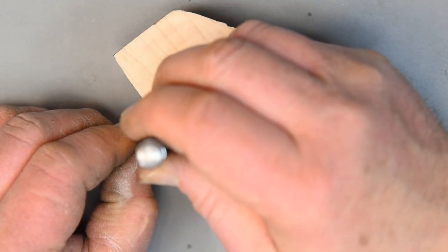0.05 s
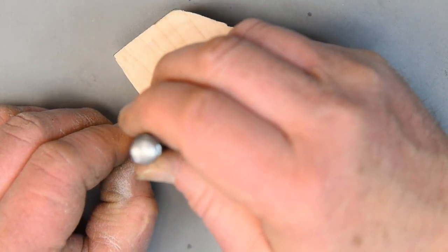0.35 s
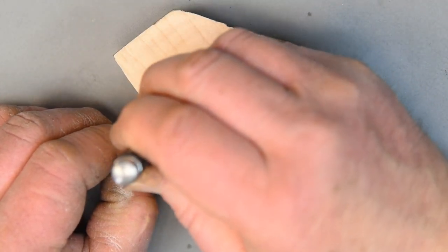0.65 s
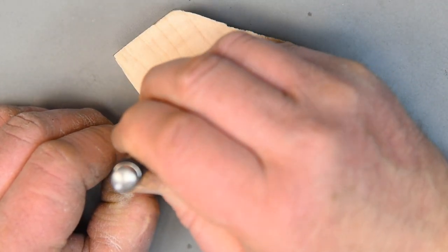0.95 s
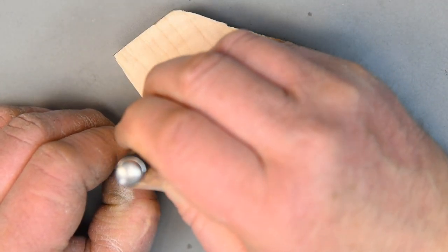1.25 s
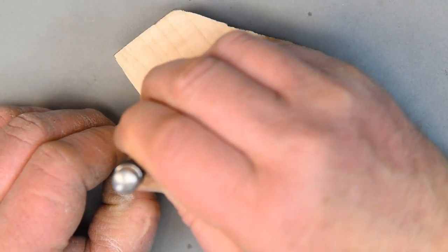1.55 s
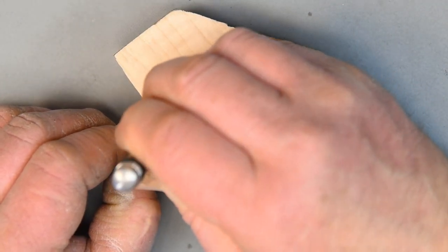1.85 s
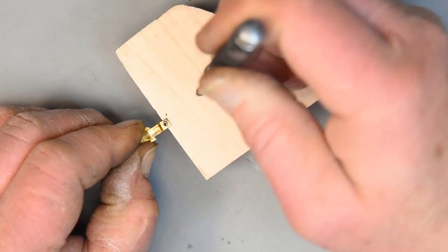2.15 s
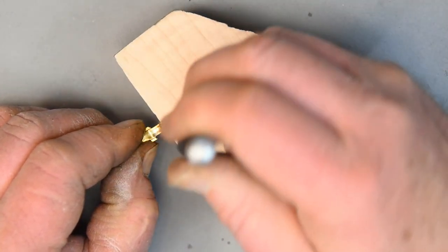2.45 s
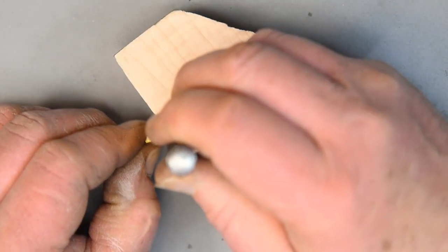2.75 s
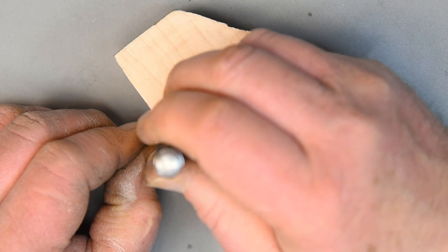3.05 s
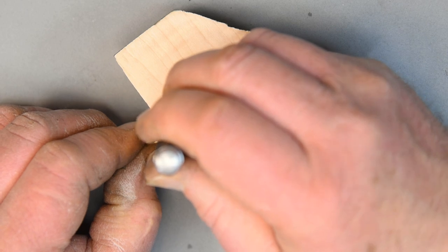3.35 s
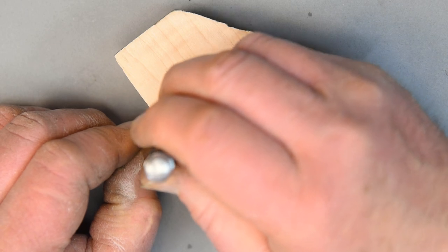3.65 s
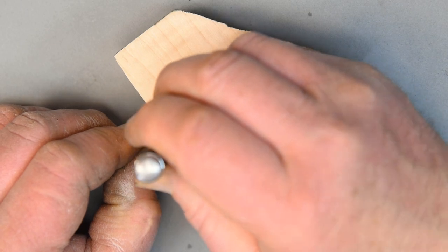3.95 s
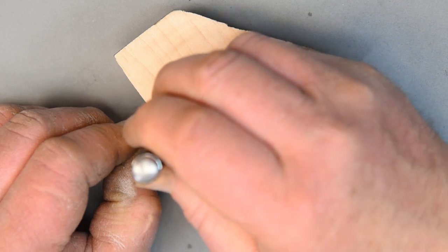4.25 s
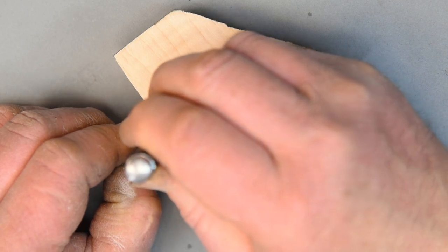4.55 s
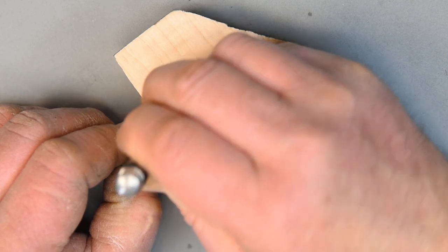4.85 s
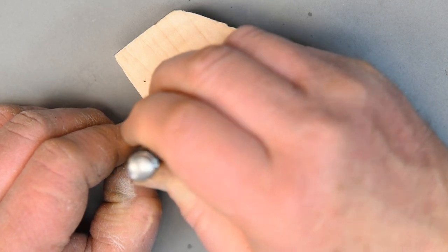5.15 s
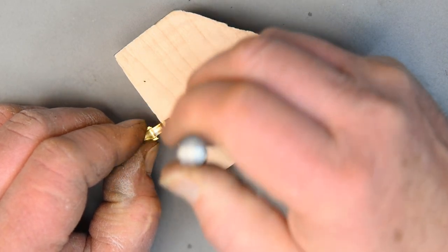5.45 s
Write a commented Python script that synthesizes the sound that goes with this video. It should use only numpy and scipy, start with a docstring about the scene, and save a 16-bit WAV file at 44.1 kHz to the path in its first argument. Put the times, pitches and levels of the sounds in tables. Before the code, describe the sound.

A spring-loaded centre punch snaps sharply twice on a small brass piece on wood, with light knocks and faint grinding between.

```python
"""A spring-loaded centre punch fires twice on a small brass contact on a wooden block.
Each time the catch lets go and the hammer snaps, ringing block and steel rod, overloading the microphone
and swaying the bench. The plunger grinds as the spring is pressed, slides back with a squeak and clacks
home. Light knocks and a bump of the hand fall between, in a small room with mains hum and hiss."""
import sys
import numpy as np
from scipy import signal
from scipy.fft import rfft, irfft
from scipy.io import wavfile

SR = 44100
rng = np.random.default_rng(int(sys.argv[2]) if len(sys.argv) > 2 else 0)


def store_pcm(level_fs):
    """Save levels as 16-bit WAV."""
    pcm = np.round(np.clip(level_fs, -1, 1) * 32767).astype(np.int16)
    wavfile.write(sys.argv[1], SR, np.atleast_2d(pcm).T)


N = 243431
TIME_S = np.arange(N) / SR
RING_S = TIME_S[:SR // 2]


def gain_of(db):
    """Decibels to amplitude."""
    return 10 ** (np.asarray(db) / 20)


def unit_rms(x):
    """Scales to rms 1."""
    return x / np.sqrt(np.mean(x ** 2) + 1e-20)


def curve_at(points, hz):
    """Interpolates on a log-frequency axis."""
    point_hz, value = np.transpose(points)
    return np.interp(np.log(hz + 1), np.log(point_hz + 1), value)


def add(mix, start_s, sound):
    """Mixes a sound in at start_s."""
    part = mix[..., round(start_s * SR):][..., :sound.shape[-1]]
    part += sound[..., :part.shape[-1]]


def panned(x, left_db):
    """Stereo, left over right by left_db."""
    return x * gain_of([[left_db / 2], [-left_db / 2]])


def lowpass(x, hz, order=3):
    """Butterworth low-pass."""
    return signal.sosfilt(signal.butter(order, min(hz, SR / 3), fs=SR, output="sos"), x)


def band(x, hz, width_hz):
    """One resonance, unity peak gain."""
    return signal.lfilter(*signal.iirpeak(hz, hz / width_hz, fs=SR), x)


def colour(x, spectrum):
    """Minimum-phase filter with the given spectrum."""
    log_gain = np.log(gain_of(curve_at(spectrum, abs(np.fft.fftfreq(2048, 1 / SR)))))
    taps = np.fft.ifft(np.exp(np.conj(signal.hilbert(log_gain)))).real
    return signal.fftconvolve(x, taps[:len(taps) // 2])[:len(x)]


def ring(modes, t60_scale=1):
    """Damped sines after a blow; a firm grip shortens them."""
    return sum(gain_of(db - 60 * RING_S / (t60_s * t60_scale)) * np.sin(2 * np.pi * hz * RING_S)
               for hz, db, t60_s in modes)


def emphasis(x, hz, boost_db, width_ratio=0.21):
    """Grip and strike point bring out one region of the ring."""
    width_hz = width_ratio * hz
    return x + (gain_of(boost_db) - 1) * band(band(x, hz, width_hz), hz, width_hz)


def hand_shadow(x, left_db=5, cutoff_hz=2300):
    """The hand shades the right channel: weaker, duller, slightly later."""
    return panned(np.array([x, lowpass(x, cutoff_hz, order=2)]), left_db)


# Noise spectrum: freq_hz, relative_db
HISS_SPECTRUM = [(20, -1.5), (60, -12.5), (150, -9.5), (300, -15.5), (700, -19), (1500, -22.5), (3100, -27),
                 (4000, -24), (4700, -17), (5500, -23), (7000, -27), (10000, -28), (15500, -28)]
# Left-right likeness: freq_hz, correlation
HISS_CORRELATION = [(60, 0.33), (180, 0.85), (550, 0.78), (1650, 0.58), (4970, 0.91), (15000, 0.08)]

def hiss(level_db=-65.5):
    """Steady hiss and rumble, partly shared by the channels."""
    hz = np.fft.rfftfreq(N, 1 / SR)
    left, independent = rfft(rng.standard_normal((2, N)))
    correlation = np.clip(curve_at(HISS_CORRELATION, hz), -1, 1)
    right = correlation * left + np.sqrt(1 - correlation ** 2) * independent
    noise = irfft(np.array([left, right]) * gain_of(curve_at(HISS_SPECTRUM, hz)), N)
    return panned(noise * gain_of(level_db) / noise.mean(0).std(), left_db=0.5)


# Drift of the fundamental: time_s, level_db
MAINS_DRIFT = [(0, -63.5), (1.5, -65), (2.5, -74), (4.4, -85), (4.85, -65.5), (5.52, -68)]
# Steady overtones: pitch_hz, level_db
MAINS_OVERTONES = [(180, -74), (300, -75), (420, -78), (540, -81), (660, -86)]

def mains_hum(pitch_hz=60, trim_db=-1):
    """Mains hum; the fundamental drifts in level."""
    drift_db = np.interp(TIME_S, *np.transpose(MAINS_DRIFT))
    hum = gain_of(drift_db + trim_db) * np.sin(2 * np.pi * pitch_hz * TIME_S)
    hum += sum(gain_of(db) * np.sin(2 * np.pi * (hz * TIME_S + rng.random()))
               for hz, db in MAINS_OVERTONES)
    return panned(np.sqrt(2) * hum, left_db=1.5)


# Room decay: freq_hz, t60_s
ROOM_DECAY = [(100, 0.43), (400, 0.22), (1200, 0.15), (3000, 0.16), (7000, 0.16), (15000, 0.11)]
# Wall reflections: freq_hz, relative_db
WALL_SPECTRUM = [(100, -2.5), (400, -3.5), (1200, 3.5), (3000, 6.5), (7000, 3.5), (15000, 1.5)]

def room(x, gap_s=0.0042):
    """Dense small-room reflections, each band dying at its own rate."""
    hz, time_s, noise = signal.stft(rng.standard_normal((2, len(RING_S))), SR, nperseg=256)
    decay_db = curve_at(WALL_SPECTRUM, hz)[:, None] - 60 * time_s / curve_at(ROOM_DECAY, hz)[:, None]
    tail = signal.istft(noise * gain_of(decay_db), SR, nperseg=256)[1][:, :len(RING_S)]
    tail *= np.clip(RING_S / gap_s - 1, 0, 1)
    return signal.fftconvolve(x, tail / np.linalg.norm(tail[0]), axes=1)[:, :N]


# Dull bench modes: pitch_hz, level_db, t60_s
BENCH_MODES = [(21, -36, .55), (36, -38, .14), (70, -45, .08), (128, -46, .12), (205, -43, .07)]

def bench(sway_hz=44, swell_s=0.16, bump_s=3.631):
    """The bench sways after each snap and thuds when the hand bumps it."""
    out = np.zeros(N)
    age = RING_S / swell_s
    sway = age ** 2 * np.exp(1 - age ** 2) * np.sin(2 * np.pi * sway_hz * RING_S)
    for start_s, *_, sway_db in SNAPS:
        add(out, start_s, gain_of(sway_db) * sway)
    add(out, bump_s, ring(BENCH_MODES))
    return panned(out, left_db=-1)


# Plunger returning: start_s, rise_s, peak_db
SQUEAK_SWELLS = [(1.838, 0.041, -64), (1.945, 0.035, -71), (2.12, 0.027, -75)]

def squeak(pitch_hz=7660, waver_hz=18):
    """Steel sticks and slips: a thin wavering whistle, quick to build, slower to die."""
    hz = pitch_hz + waver_hz * unit_rms(lowpass(rng.standard_normal(N), hz=120))
    whistle = unit_rms(np.sin(2 * np.pi * np.cumsum(hz) / SR))
    envelope = np.zeros(N)
    for start_s, rise_s, peak_db in SQUEAK_SWELLS:
        age = np.maximum(TIME_S - start_s, 0) / rise_s
        envelope += gain_of(peak_db) * (age * np.exp(1 - age)) ** 1.8
    return panned(envelope * whistle, left_db=3)


# Tip on brass: start_s, length_s, level_db, centre_hz
TIP_SLIDES = [(1.829, .06, -66, 3900), (2.082, .12, -70.5, 7000), (2.434, .09, -71, 6900)]

def tip_slides(width_hz=1800):
    """The tip slides lightly over brass: short soft hisses."""
    out, noise = np.zeros(N), rng.standard_normal(N)
    for start_s, length_s, level_db, centre_hz in TIP_SLIDES:
        friction = unit_rms(band(band(noise, centre_hz, width_hz), centre_hz, width_hz))
        arch = np.sin(np.pi * np.clip((TIME_S - start_s) / length_s, 0, 1))
        out += gain_of(level_db) * arch * friction
    return panned(out, left_db=3)


# Punch, block and bench together: pitch_hz, relative_db, t60_s
BODY_MODES = [(123, -9.5, 0.054), (260, -19.5, 0.057), (362, -47.5, .07), (370.7, -0.5, 0.046),
              (422.6, 0.5, 0.038), (519, -5, 0.046), (605, -13.5, 0.1), (673.4, 0.5, 0.038),
              (839.4, -11, 0.1), (952, -12.5, 0.095), (1217, -30, 0.21), (1314, -4, 0.025),
              (1461, 6, 0.015), (1538, 0.5, 0.023), (1836, -2.5, 0.052), (2241, -6, 0.051)]

def block_blow(hardness_hz, t60_scale=1, gain_db=-9, highpass_hz=230, rise_s=0.0013):
    """The struck block builds briefly and radiates little bass; soft contact cannot drive high modes."""
    body = ring(BODY_MODES, t60_scale) * (1 - np.exp(-RING_S / rise_s))
    radiated = signal.sosfilt(signal.butter(2, highpass_hz, "high", fs=SR, output="sos"), body)
    return gain_of(gain_db) * lowpass(radiated, hardness_hz, order=4)


# Steel on steel: freq_hz, relative_db
CRACK_SPECTRUM = [(300, -3), (1500, -7), (3000, -10.5), (4200, -10.5), (5200, 0.5), (6200, -1.5), (7600, 0),
                  (9000, -7), (10500, -4), (13000, -8.5), (16000, -16)]
# Steel rod: pitch_hz, relative_db, t60_s
ROD_MODES = [(5160, -5, .06), (5225, -12, .035), (5040, -13, .035), (4150, -16, .03), (3350, -18, .03),
             (5600, -20, .05), (6300, -21, .04), (7500, -15, .03), (10100, -14, .025), (11300, -20, .03)]

def steel_tick(rod_db, crack_t60_s=0.0094, chatter_db=-20, chatter_t60_s=0.059, noise_db=-2, spread=0.78):
    """A steel crack and chatter of loose parts, differing per channel, plus the rod's ring."""
    envelope = gain_of(-60 * RING_S / crack_t60_s) + gain_of(chatter_db - 60 * RING_S / chatter_t60_s)
    shared, *channels = rng.standard_normal((3, len(envelope)))
    crack = np.array([colour(envelope * (shared + spread * own), CRACK_SPECTRUM) for own in channels])
    return gain_of(noise_db) * crack + gain_of(rod_db) * ring(ROD_MODES)


def stroke(start_s, length_s, level_db, swell_db,
           attack_s=0.014, release_s=0.02, breakaway_db=6.5, breakaway_s=0.016):
    """Friction envelope: the plunger breaks loose, swells or fades with spring load, and stops."""
    age_s = np.maximum(TIME_S - start_s, 0)
    gate = np.minimum(age_s / attack_s, 1) * np.exp(-np.maximum(age_s - length_s, 0) / release_s)
    unstick_db = breakaway_db * np.exp(-age_s / breakaway_s)
    load_db = swell_db * np.minimum(age_s / length_s, 1)
    return gate * gain_of(level_db + unstick_db + load_db)


# Plunger rubbing in its sleeve: start_s, length_s, level_db, swell_db
PLUNGER_STROKES = [(0.754, 0.14, -59, -7), (0.946, .11, -69.5, 0), (1.443, 0.068, -60.5, 0.5),
                   (1.515, 0.15, -54, 6), (1.838, .13, -56.5, 3), (2.078, .1, -61, -7.5),
                   (4.722, 0.27, -51, 3), (5.073, 0.067, -62.5, 12.5), (5.197, .08, -65.5, 7)]

def grinding(slips_per_s=1500, light_hz=700, hard_hz=1550, firm_db=-47, grip_hz=375, grip_db=3):
    """Tiny uneven plunger slips shake the block, brighter under a firm push."""
    envelope = sum(stroke(*row) for row in PLUNGER_STROKES)
    firmness = np.clip(envelope / gain_of(firm_db), 0, 1)
    slips = rng.standard_normal((2, N)) * (rng.random((2, N)) < slips_per_s / SR)
    blows = [emphasis(block_blow(hz), grip_hz, grip_db) for hz in (light_hz, hard_hz)]
    light, hard = (unit_rms(signal.fftconvolve(train, blow)[:N]) for train, blow in zip(slips, blows))
    return hand_shadow(envelope * (np.sqrt(1 - firmness) * light + np.sqrt(firmness) * hard))


# Tip and plunger impacts: start_s, blow_db, hardness_hz, steel_db, emphasis_hz, boost_db
PUNCH_KNOCKS = [(0.361, -43, 590, -75, 397, 4), (0.4531, -22.5, 660, -48, 378, 6),
                (0.4736, -15, 1640, -25, 1398, 8), (0.737, -48, 1500, -59.5, 3350, 37),
                (1.961, -29.5, 1290, -62, 380, 4), (1.975, -15.5, 1960, -39.5, 1670, 5.5),
                (2.058, -29, 596, -43.5, 379, 5.5), (2.125, -39, 505, -68, 383, -3),
                (3.156, -38.5, 446, -80, 377, 7.5), (3.18, -37, 450, -80, 352, 4),
                (3.61, -33.5, 460, -82, 404, 5.5), (3.9247, -28, 608, -83, 1470, 30),
                (5.125, -30, 1390, -50, 770, 13), (5.1356, -16.5, 1870, -41.5, 1623, 8),
                (5.274, -32, 790, -48, 766, 6.5)]

def knocks(grip_t60_scale=0.76, bright_hz=7700, bright_db=6):
    """The tip lands on the contact or the plunger meets its stop; fingers damp the ring."""
    wood, steel = np.zeros(N), np.zeros((2, N))
    for start_s, blow_db, hardness_hz, steel_db, emphasis_hz, boost_db in PUNCH_KNOCKS:
        blow = block_blow(hardness_hz, grip_t60_scale)
        add(wood, start_s, gain_of(blow_db) * emphasis(blow, emphasis_hz, boost_db))
        add(steel, start_s, gain_of(steel_db) * emphasis(steel_tick(rod_db=-15.5), emphasis_hz, boost_db))
    return hand_shadow(wood) + panned(emphasis(steel, bright_hz, bright_db), left_db=5)


# Hammer firing: start_s, blow_db, hardness_hz, steel_db, low_hz, low_boost_db,
# high_hz, high_boost_db, crack_hz, crack_boost_db, rod_db, sway_db
SNAPS = [(1.6403, -11, 2510, -9.5, 694, 5.5, 1250, 6, 8660, 5, -25.5, -47.5),
         (4.9126, -5.5, 2380, -9.5, 393, 5, 1614, 5, 3400, 6, -8.5, -45)]

def snaps(flight_s=0.001768, catch_db=-16, hammer_db=-4, hammer_hz=1700, hammer_width_hz=900,
          shove_hz=300, shove_db=-27, shove_t60_s=0.03):
    """The catch lets go and shoves the block; the hammer lands flight_s later and drives upper modes."""
    wood, steel = np.zeros(N), np.zeros((2, N))
    for (start_s, blow_db, hardness_hz, steel_db, low_hz, low_boost_db,
         high_hz, high_boost_db, crack_hz, crack_boost_db, rod_db, _) in SNAPS:
        kick = gain_of(blow_db) * emphasis(block_blow(hardness_hz), low_hz, low_boost_db)
        kick = emphasis(kick, high_hz, high_boost_db)
        add(wood, start_s, kick + ring([(shove_hz, shove_db, shove_t60_s)]))
        add(steel, start_s, gain_of(steel_db + catch_db) * steel_tick(rod_db))
        impact_s = start_s + flight_s
        crack = emphasis(steel_tick(rod_db), crack_hz, crack_boost_db, width_ratio=0.54)
        add(wood, impact_s, gain_of(hammer_db) * band(kick, hammer_hz, hammer_width_hz))
        add(steel, impact_s, gain_of(steel_db) * crack)
    return hand_shadow(wood) + panned(steel, left_db=4)


def scene(handling_room_db=-14, snap_room_db=-9):
    """The punch close up; the loud snaps have a stronger room tail than the knocks and rubs."""
    handling = knocks() + grinding() + squeak() + tip_slides()
    firing = snaps()
    reflections = room(gain_of(handling_room_db) * handling + gain_of(snap_room_db) * firing)
    return handling + firing + reflections + bench() + hiss() + mains_hum()


def record(dry):
    """The microphone overloads on the snaps; a low-pass follows."""
    ceiling, knee, cutoff_hz = 0.22, 5, 16100
    clipped = dry / (1 + abs(dry / ceiling) ** knee) ** (1 / knee)
    taps = signal.firwin(401, cutoff_hz, window=("kaiser", 8), fs=SR)
    return signal.oaconvolve(clipped, taps[None], "same")


dry = scene()
out = record(dry)
store_pcm(out)
```